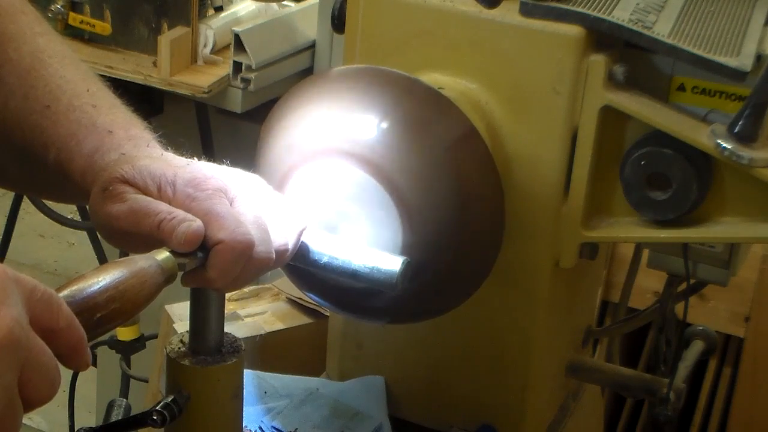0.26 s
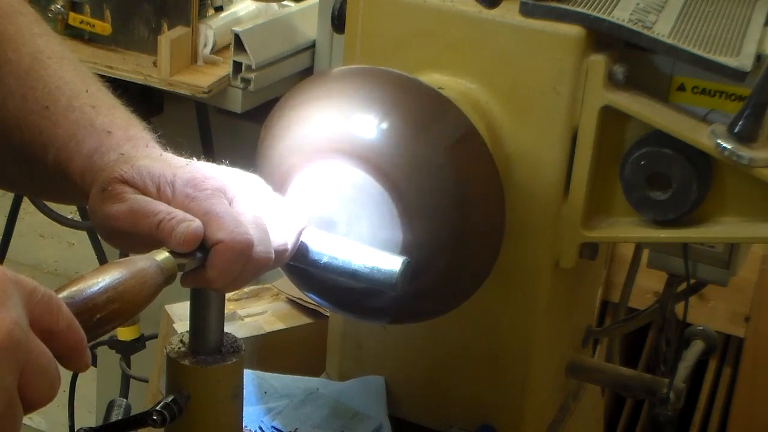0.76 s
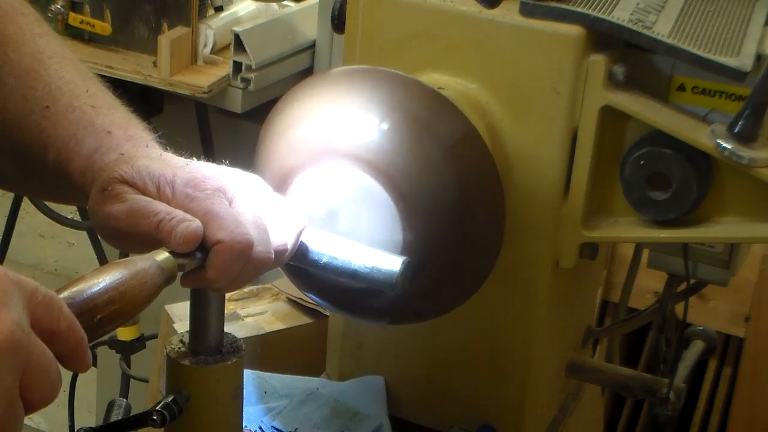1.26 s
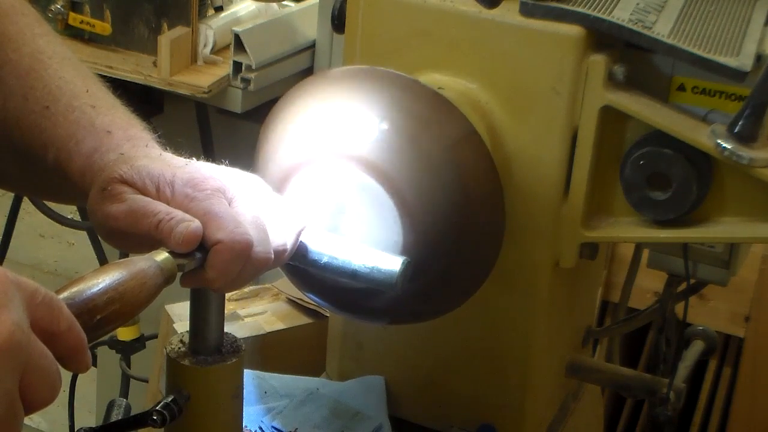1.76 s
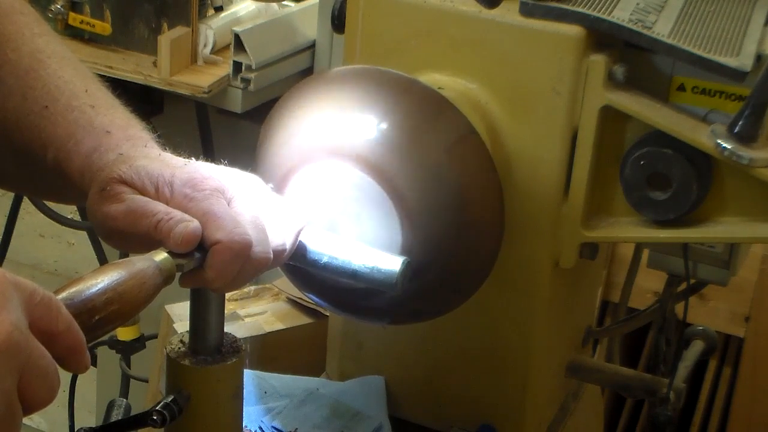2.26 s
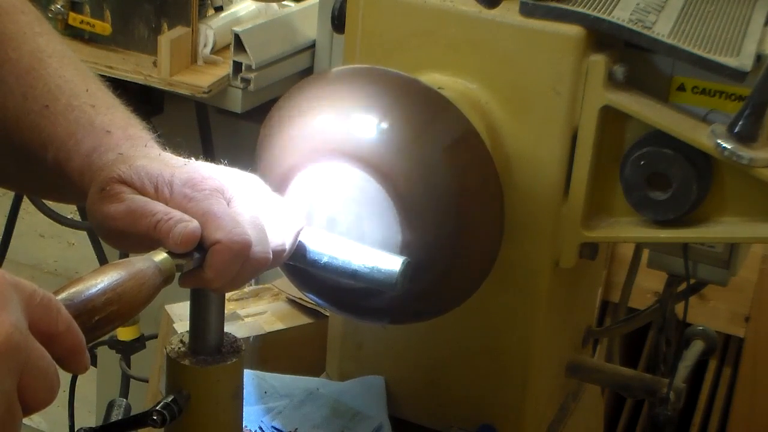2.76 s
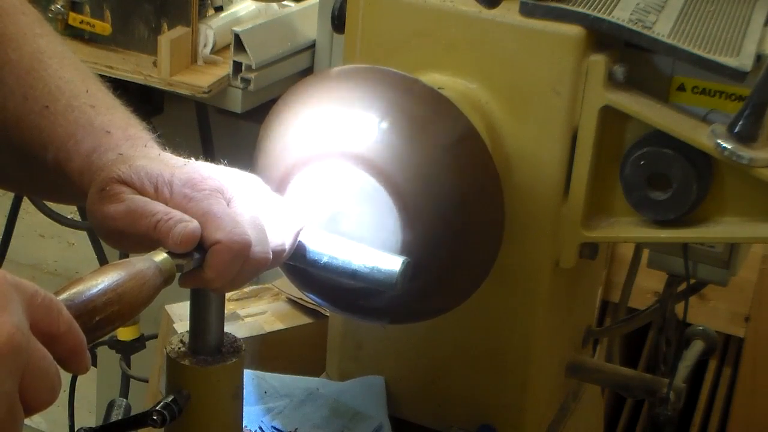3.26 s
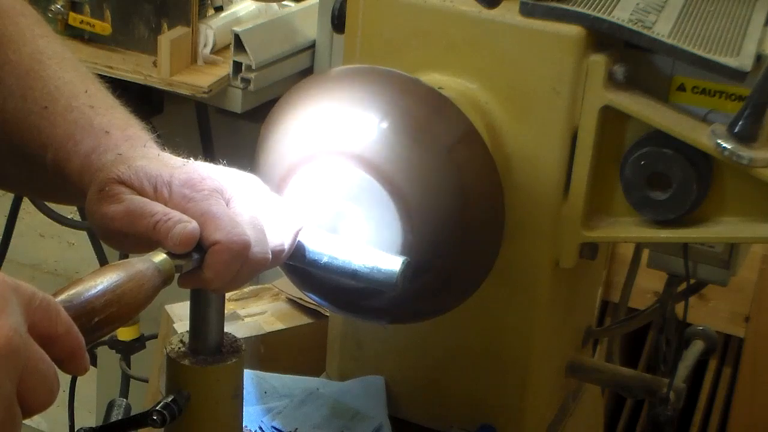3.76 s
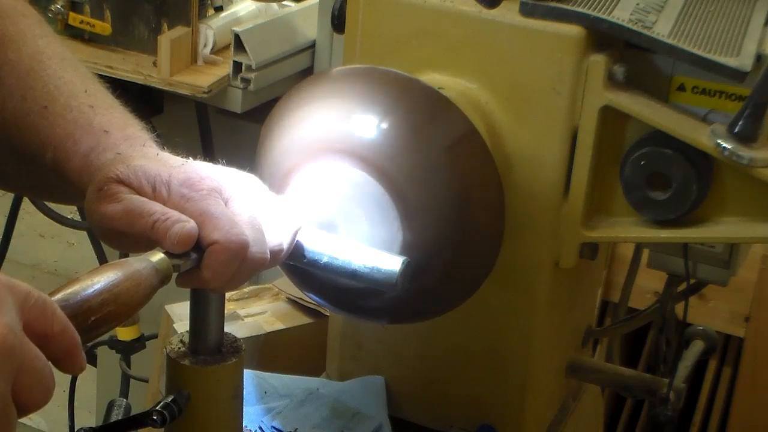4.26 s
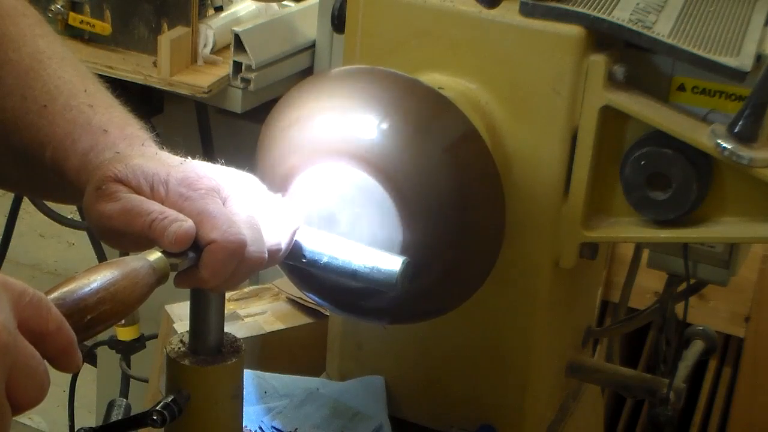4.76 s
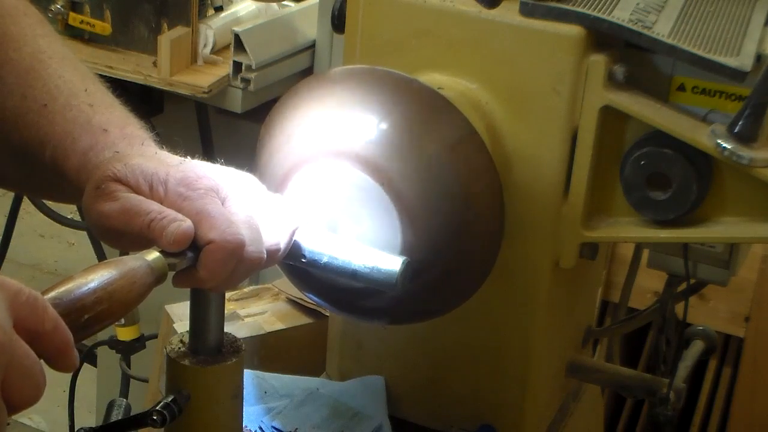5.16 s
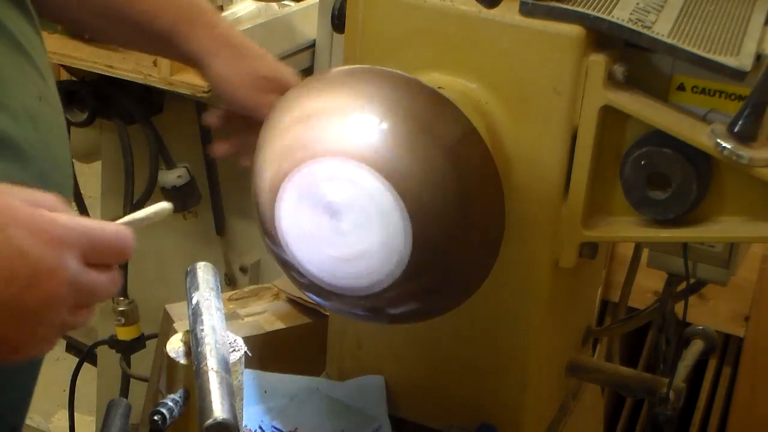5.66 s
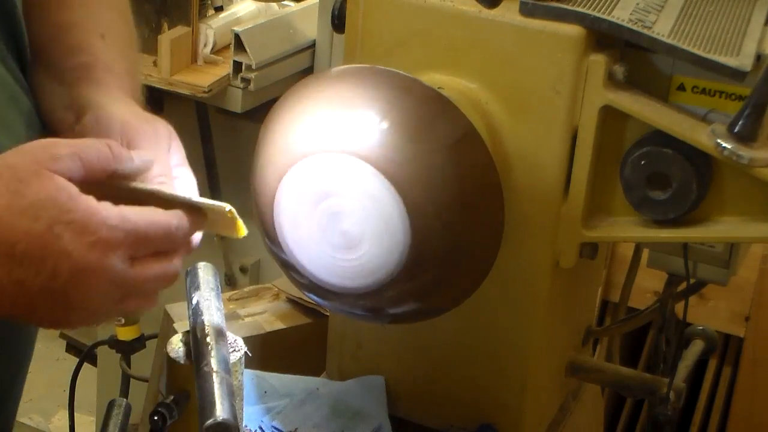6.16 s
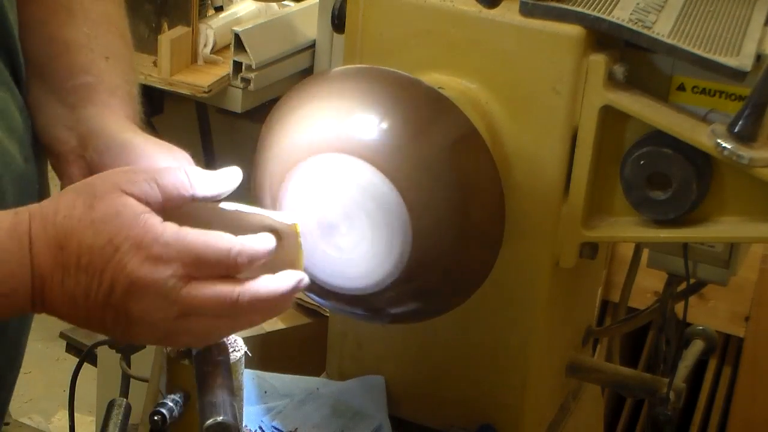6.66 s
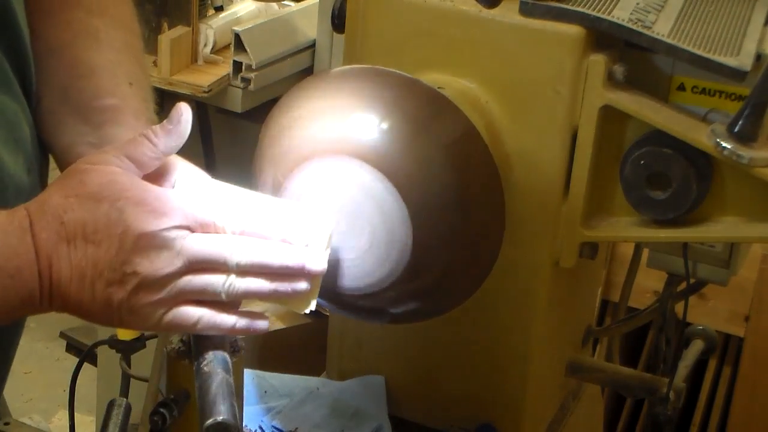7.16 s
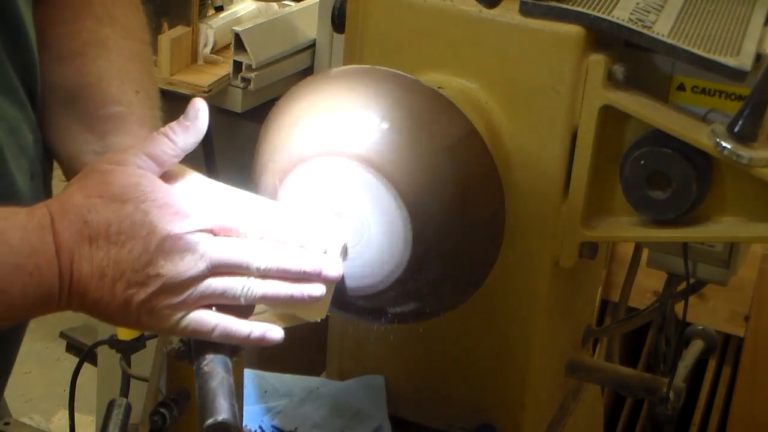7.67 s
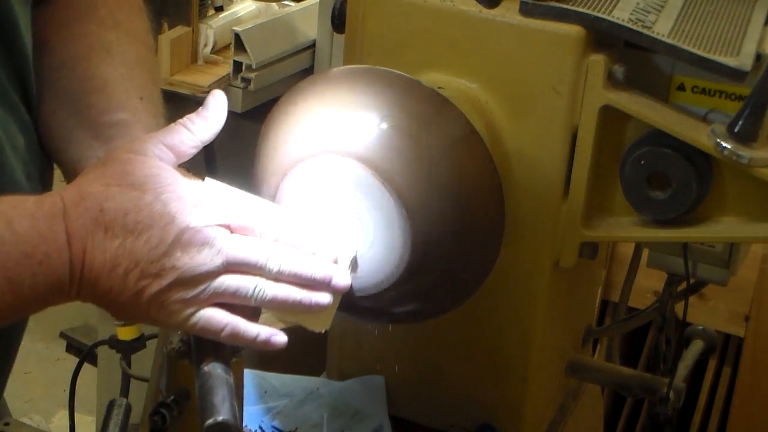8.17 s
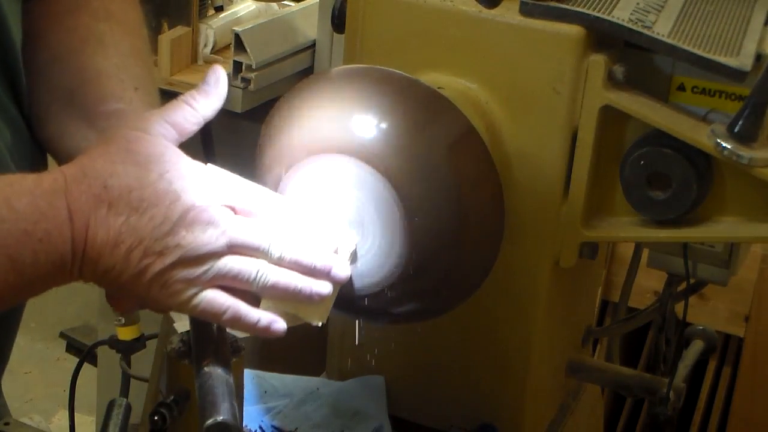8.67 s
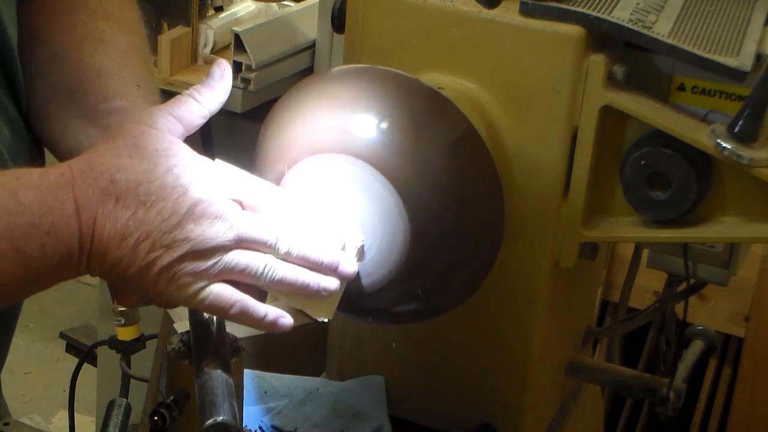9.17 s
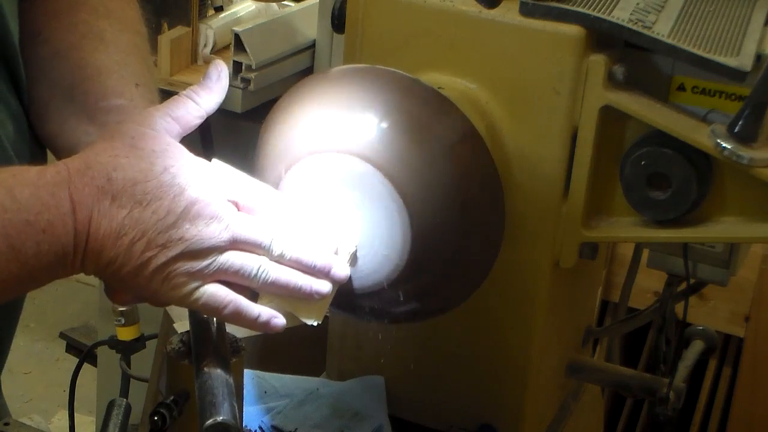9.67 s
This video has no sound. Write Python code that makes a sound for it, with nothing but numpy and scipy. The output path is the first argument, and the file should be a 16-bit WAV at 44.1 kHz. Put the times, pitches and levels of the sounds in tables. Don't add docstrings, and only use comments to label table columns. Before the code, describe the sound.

Close camera sound of woodturning over a constant low fan drone and lathe motor. For over five seconds the scraper bites twice per turn, one bite stronger, giving a rapid pulsing squeal and tearing hiss. A sudden change leaves the lathe stopped; metal clacks with a short room tail, the motor runs up, paper rustles lightly, and gritty sanding settles into a smooth, faintly throbbing hiss. The machine level ducks under loud arrivals.

```python
import sys
import numpy as np
from scipy import signal
from scipy.fft import rfft, irfft
from scipy.io import wavfile
from scipy.ndimage import uniform_filter1d, map_coordinates

SR = 44100
rng = np.random.default_rng(int(sys.argv[2]) if len(sys.argv) > 2 else 0)


def magnitude_from_level(level_db):
    exponent = np.asarray(level_db, float) / 20
    return 10 ** exponent


def to_wav(s):
    ch = np.atleast_2d(s).T
    pcm = np.round(np.clip(ch, -1, 1) * 32767)
    wavfile.write(sys.argv[1], SR, pcm.astype(np.int16))


N = 437472
T = np.arange(N) / SR
F = np.maximum(np.fft.rfftfreq(N, 1 / SR), 1)
TURN_HZ, MOTOR_TURNS = 11.718, 2.5
CUT_END_S = 5.387


def unit(x):
    return x / np.sqrt(np.mean(x ** 2))


def noise():
    return rng.standard_normal(N)


def curves(table):
    s, *columns = np.transpose(table)
    return [np.interp(T, s, c) for c in columns]


def shape(table):
    hz, db = np.transpose(table)
    return magnitude_from_level(np.interp(np.log(F), np.log(hz), db))


def colour(x, table):
    return unit(irfft(rfft(x) * shape(table), N))


def resonance(x, hz, width):
    return signal.lfilter(*signal.iirpeak(hz, hz / width, SR), x)


def ring(x, modes):
    return sum(magnitude_from_level(db) * unit(resonance(x, hz, width)) for hz, width, db in modes)


def walk(rate):
    k = int(SR / rate)
    steps = np.repeat(rng.standard_normal(N // k + 1), k)
    return unit(uniform_filter1d(uniform_filter1d(steps, k), k)[:N])


def tones(turns, orders, flutter_db):
    out = 0
    for multiple, db in orders:
        level = magnitude_from_level(db + flutter_db * walk(9)) * np.sqrt(2)
        phase = 2 * np.pi * (multiple * turns + rng.random()) + 0.32 * flutter_db * walk(4)
        out = out + level * np.sin(phase)
    return out


# (multiple of the shaft, level/dB)
FAN_ORDERS = [(9, 0), (1, -10), (2, -12), (4, -13), (5.06, -11), (6, -17), (7.1, -13), (10.1, -14),
              (11, -14), (12.15, -10), (13.1, -7)]
# (f/Hz, level/dB per Hz)
FAN_AIR = [(12, -30), (20, 2.5), (150, -19.5), (176, -10), (267, -7), (323, -16), (577, -5.5), (781, -9.5),
           (1120, -9), (1510, -14.5), (4560, -18.5), (5840, -26.5), (14500, -29)]
# (f/Hz, width/Hz, level/dB)
FAN_DUCT = [(1098, 42, -7), (1290, 60, -8.5), (4600, 310, -12), (5440, 150, -14.5)]


def fan():
    turns = 29.585 * T
    air = magnitude_from_level(3) * colour(noise(), FAN_AIR) + ring(noise(), FAN_DUCT)
    blade = tones(turns, FAN_ORDERS[:1], 0.38)
    return blade + tones(turns, FAN_ORDERS[1:], 2.45) + air


def lathe_speed():
    switch_on_s, run_up_s, bend, full_speed = 5.69, 0.82, 0.7, 0.99
    up = full_speed * np.clip((T - switch_on_s) / run_up_s, 0, 1) ** bend
    return np.where(T < CUT_END_S, 1, up)


# (f/Hz, level/dB per Hz)
MOTOR_AIR = [(240, -46), (400, -6.5), (472, -11), (516, -5.5), (600, -20), (798, -4), (1640, -6),
             (2320, -14), (4490, -26.5), (7160, -39), (10100, -21), (14500, -48)]
# (f/Hz, width/Hz, level/dB)
MOTOR_CASE = [(900, 24, -26), (1064, 10, -2.5), (1361, 17, -1), (1530, 54, -9.5), (1599, 14, -1.5),
              (1646, 45, -5.5), (4340, 260, -7.5), (3106, 64, -6.5)]
# (multiple of the motor shaft, level/dB)
MOTOR_ORDERS = [(18.2, -2), (24.05, -10), (28.1, -7)]
# (f/Hz off the carrier at full speed, level/dB)
WHINE = [(-617, -21), (-267, -17), (-29.5, -14), (29.5, -15), (88, -12), (266, -14), (352, -18), (444, -14),
         (499, -11), (616, -20), (734, -17)]


def motor():
    speed = lathe_speed()
    run = np.cumsum(speed) / SR
    db = np.where(T < CUT_END_S, -2.5, 1 - 16.5 * (1 - speed))
    air = magnitude_from_level(7 + 1.1 * walk(15)) * colour(noise(), MOTOR_AIR) + ring(noise(), MOTOR_CASE)
    belt_load = magnitude_from_level(1.5 * np.cos(2 * np.pi * TURN_HZ * run))
    shaft = tones(TURN_HZ * MOTOR_TURNS * run, MOTOR_ORDERS, 1.95) * belt_load
    carrier_hz, whine = 10000, 0
    for off, tone_db in WHINE:
        level = magnitude_from_level(tone_db + 1.6 * walk(6)) * speed ** (abs(off) / 500)
        whine = whine + level * np.sin(2 * np.pi * (carrier_hz * T + off * run + rng.random()))
    return (speed > 0) * (magnitude_from_level(db) * (air + speed ** 12 * shaft) + magnitude_from_level(3.5 + 0.09 * db) * whine)


# (t/s, peak level/dB)
RUSTLE = [(6.1469, -49), (6.2267, -34), (6.441, -34), (6.49, -36), (6.589, -39), (6.6194, -36),
          (6.7281, -42), (6.7593, -42), (6.8229, -36), (6.8578, -35), (7.0098, -41), (7.0992, -47),
          (7.2595, -39), (7.4293, -37)]
# (f/Hz, level/dB per Hz)
GRIT = [(880, -39), (1500, -3.5), (1620, -11.5), (1920, -5.5), (2610, -0.5), (3120, -6), (4060, 2),
        (5340, 3.5), (6030, 0.5), (7150, 2), (8000, -3.5), (9660, -0.5), (13500, -6), (14200, -10)]
# (t/s, level/dB)
RUB = [
    (7.46, -51),
    (7.57, -41.5),
    (7.64, -30),
    (7.77, -34),
    (7.79, -36),
    (7.9, -35),
    (8.0, -32),
    (8.6, -31.5),
    (9.92, -33),
]
# (t/s, level/dB)
JABS = [(7.605, 3.1), (7.75, 2.3), (7.939, 2.2), (8.03, 2.2), (8.1, 2), (8.265, 2.7), (8.45, 1.7),
        (9.46, 2), (9.87, 2)]
# (level/dB over the rubbing, level/dB gained with dust, share of a jab)
SAND_RANGES = [
    (-4.5, -2, 1.45),
    (0.5, -0.65, 0.7),
    (-1.5, 3, 0.42),
]
SAND_EDGES_HZ = [0, 3600, 7600, 22050]


def paper():
    folds = sum(magnitude_from_level(db - 4) * (T > s) * np.exp(-np.maximum(T - s, 0) / 0.015) for s, db in RUSTLE)
    out = folds * colour(noise(), [(1000, -11), (3000, 6), (5000, 4), (9000, -9), (14000, -7)])
    throb_db = 0.94 * np.cos(2 * np.pi * (2 * TURN_HZ * T - .05))
    grit = rfft(noise() * magnitude_from_level(0.63 * walk(300) + throb_db)) * shape(GRIT[:-1])
    rub_db = curves(RUB)[0]
    dust = np.tanh(np.maximum(T - RUB[4][0], 0) / 0.7) ** 2
    jab_db = sum(db * np.exp(-.5 * ((T - s) / 0.011) ** 2) for s, db in JABS)
    for (db, dust_db, share), lo, hi in zip(SAND_RANGES, SAND_EDGES_HZ, SAND_EDGES_HZ[1:]):
        flicker_db = walk(25) + 0.35 * walk(70)
        level = magnitude_from_level(rub_db + db + dust_db * dust + share * jab_db + flicker_db)
        out = out + (T > RUB[0][0]) * level * unit(irfft(grit * (F > lo) * (F <= hi), N))
    return out


# (t/s, peak level/dB, share that fills the shop)
CLACK = [
    (5.5377, -13.5, 0.89),
    (5.5386, -11.5, 0),
    (5.5397, -18, 0.32),
    (5.757, -42, 0.78),
]
# (f/Hz, level/dB, t60/s)
CLACK_MODES = [(326, -14.5, .15), (395, -8, 0.26), (1300, 0, 0.005), (2406, -9, 0.0038), (2880, -20, .06),
               (3332, 9, 0.0038), (3440, -22, 0.31), (3620, -22, 0.28), (4700, -23, .22), (4430, 2, 0.0079),
               (7000, -17, .002)]
# (f/Hz, level/dB per Hz)
CLACK_TAIL = [(150, -23), (330, -3), (480, -5), (600, -8.5), (1600, -11), (2600, -8), (3600, -8),
              (4900, -9), (5600, -17), (14500, -26)]


def clack():
    out, shop = 0, colour(noise(), CLACK_TAIL)
    for s, peak_db, share in CLACK:
        t = np.maximum(T - s, 0)
        modes = 0
        for k, (hz, db, t60) in enumerate(CLACK_MODES):
            modes = modes + (-1) ** k * magnitude_from_level(db - 60 * t / t60) * np.sin(2 * np.pi * hz * t)
        tail = magnitude_from_level(-60 * t / 0.11) + magnitude_from_level(-11.5 - 60 * t / 0.71)
        build = np.minimum(t / 0.0019, 1)
        out = out + magnitude_from_level(peak_db - 9) * (modes + share * build * magnitude_from_level(-3.5) * tail * shop)
    return out


def ridges():
    size, memory, wobble_s = int(SR / TURN_HZ) + 1, 0.96, 4e-5
    rows = signal.lfilter([1], [1, -memory], rng.standard_normal((90, size)), axis=0)[20:]
    wobbly = T + wobble_s * np.sin(2 * np.pi * TURN_HZ * MOTOR_TURNS * T)
    turns = TURN_HZ * np.minimum(wobbly, 5.5) + 1
    return unit(map_coordinates(rows, [turns // 1, turns % 1 * (size - 1)], order=3))


def turns_from(at, late):
    return (TURN_HZ * T - late - at + .5) % 1 - .5


def bite(bites, weak_db, late):
    swell = []
    for at, rise, fall, db in bites:
        off = turns_from(at, late)
        swell.append(db * np.exp(-.5 * (off / np.where(off < 0, rise, fall)) ** 2))
    return magnitude_from_level(swell[0] + swell[1] * (1 + weak_db / bites[1][3]))


# (place/turns, length/turns, f/Hz, glide/Hz per turn, level/dB, share of weaker bite's dB)
CHATTER = [(.48, .06, 2200, 250, -3, 0), (.5, .065, 2335, 150, -2.5, 0), (.92, .055, 2230, 300, -8, 2.2),
           (.94, .06, 2335, 0, -7.5, 2.2), (.5, .05, 2580, 0, -13, 0), (.93, .04, 3090, 0, -13, 0),
           (.51, .045, 5280, 1500, -11, 0)]
# (place/turns, f/Hz, centre t/s, span/s, level/dB)
PASSING = [(.5, 3900, 3.4, .6, -7), (.5, 3600, 4.9, .5, -6), (.5, 5560, 2.6, 1.4, -10),
           (.49, 3050, 3.5, .5, -7), (.49, 3060, .8, 1, -7), (.5, 5200, 3.6, 1.5, -5),
           (.4, 850, 3.8, 1.8, -7), (.42, 3520, .3, .5, -8), (.5, 4000, 1, .5, -9), (.5, 4190, 2.8, .7, -8),
           (.55, 4350, 4, .8, -7), (.5, 5000, 2.1, .4, -8), (.47, 2090, 3.6, .5, -8)]


def chatter(weak_db, late):
    bursts = [(*row[:4], magnitude_from_level(row[4] + row[5] * weak_db)) for row in CHATTER]
    for at, hz, s, span, db in PASSING:
        bursts.append((at, 0.036, hz, 0, magnitude_from_level(db) * np.exp(-.5 * ((T - s) / span) ** 2)))
    out = 0
    for at, length, hz, glide, size in bursts:
        off = turns_from(at, late)
        phase = 2 * np.pi * (hz + glide * off / 2) * off / TURN_HZ
        phase = phase + 0.76 * walk(3.02) + 0.2 * walk(120)
        level = size * magnitude_from_level(0.56 * walk(6.5) + 0.74 * walk(150))
        out = out + level * np.exp(-.5 * (off / length) ** 2) * np.sin(phase)
    return out


# (t/s, pressure level/dB, weaker bite level/dB)
PRESSURE = [(0, 1, 2), (.6, .5, 1), (1.3, 0.5, -1), (2.6, 0, -0.5), (3.6, -0.5, -1), (4.6, -0.1, 0),
            (5.39, 0.5, -2.5)]
# (place/turns, rise/turns, fall/turns, swell level/dB)
BOWL_BITES = [
    (.42, 0.01, 0.015, 11.4),
    (.84, 0.014, 0.027, 2.1),
]
TOOL_BITES = [
    (.48, 0.11, 0.14, 9.6),
    (.92, 0.074, 0.15, 7.7),
]
HISS_BITES = [
    (.47, 0.058, 0.11, 11.2),
    (.97, 0.015, 0.21, 3.6),
]
# (f/Hz, width/Hz, level/dB)
BOWL = [(820, 47, 0.5), (832, 71, -1), (897, 82, 2), (895, 99, -29), (1393, 52, 0)]
REST = [(198, 9.6, 6), (218, 14, -3)]
TOOL_LOW = [(2090, 45, -11), (2191, 35, -2), (2250, 40, -9), (2332, 35, 0), (2414, 35, -7), (2578, 45, -10),
            (3047, 50, -8), (3125, 60, -10)]
TOOL_HIGH = [(3450, 26, -5), (3550, 17, 0), (4240, 26, 0), (4345, 58, -1), (4570, 70, -6), (5090, 200, 1),
             (5650, 150, -17)]
SHAVING_RING = [(6360, 120, -14.5), (6670, 69, -11.5), (7260, 90, -15.5), (8530, 410, -10.5),
                (9070, 170, -12), (9850, 140, -18)]
# (f/Hz, level/dB per Hz)
SHAVING = [(600, -10), (1500, -10.5), (4000, 3.5), (6500, -3), (7800, -7.5), (9000, -8), (11000, -10.5),
           (13000, -7.5), (14500, -22)]
# (f/Hz, width/Hz, share removed 0-1)
TOOL_DIPS = [(2740, 92, 0.05), (3760, 150, 0.46), (4670, 140, 0.27), (2455, 32, 0.3), (3380, 76, 0.1)]
# (level/dB at the start, slope/dB per s)
LAYERS = [
    (-43, 0.07),
    (-34, -.5),
    (-36, -0.91),
    (-43.5, .7),
    (-35.5, 0.23),
]


def scraper():
    push_db, weak_db = curves(PRESSURE)
    late = .03 - 0.007565 * T
    wood, fresh = ridges(), noise()
    shove = wood * bite(BOWL_BITES, 0, late)
    no_bass = signal.butter(4, 760, "high", fs=SR, output="sos")
    bowl = signal.sosfilt(no_bass, ring(shove, BOWL))
    edge = (wood + magnitude_from_level(-9.5) * fresh) * bite(TOOL_BITES, weak_db, late)
    tear = (fresh + 0.81 * wood) * bite(HISS_BITES, weak_db, 0) * magnitude_from_level(1.04 * walk(150))
    hiss = colour(tear, SHAVING) + ring(tear, SHAVING_RING)
    layers = [bowl, chatter(weak_db, late), ring(edge, TOOL_LOW), ring(edge, TOOL_HIGH), hiss]
    out = sum(magnitude_from_level(db + slope_db * T) * unit(x) for (db, slope_db), x in zip(LAYERS, layers))
    for hz, width, share in TOOL_DIPS:
        out = out - share * resonance(out, hz, width)
    rest_db = -55.5 - 12 * np.tanh(((T - 3.15) / 1.7) ** 2)
    rest = magnitude_from_level(rest_db) * unit(ring(shove, REST))
    return (T < CUT_END_S) * magnitude_from_level(push_db) * (out + rest)


# (t/s, depth level/dB, attack/s, hold/s, release/s)
DUCKS = [
    (5.528, -14.5, 0.077, 0.36, 0.21),
    (7.577, -4.5, 0.25, 0.061, 0.19),
]


def gain_db():
    rest_db, under_cut_db, under_sand_db = -45, -5.5, -2.5
    sanding = np.clip((T - RUB[1][0]) / 0.14, 0, 1)
    db = rest_db + under_cut_db * (T < CUT_END_S) + under_sand_db * sanding
    for s, depth_db, attack, hold, release in DUCKS:
        corners = np.cumsum([0, attack, hold, release])
        db = db + depth_db * np.interp(T - s, corners, [0, 1, 1, 0])
    return db


# (f/Hz, side level/dB)
SIDE_DB = [(25, 4), (70, -9), (125, -5.5), (250, -20.5), (680, -16.5), (1250, -18), (2300, -16.5),
           (4210, -8.5), (7740, -1), (14200, -4.5)]
# (f/Hz, level/dB)
LEAN_DB = [(60, -1.3), (110, 0.32), (200, -1.2), (370, 0.16), (680, 0.44), (1250, -0.39), (2300, 0.83),
           (4210, 0.2), (7740, -0.2), (14200, -2.0)]


def scene():
    gain = magnitude_from_level(gain_db())
    work = scraper() + clack() + paper()
    mid = rfft(gain * (fan() + motor()) + work)
    scatter = rfft(noise() * np.exp(-T / 0.022))
    scattered_work = rfft(work) * scatter / np.abs(scatter)
    side = shape(SIDE_DB) * (rfft(gain * (fan() + motor())) + scattered_work)
    lean = np.sqrt(shape(LEAN_DB))
    return np.array([irfft((mid + side) * lean, N), irfft((mid - side) / lean, N)])


def top_cut(x):
    return signal.sosfilt(signal.butter(12, 14800, fs=SR, output="sos"), x)


def record(dry):
    mix = irfft(rfft(dry) * (F < 14300), N)
    return top_cut(mix)


dry = scene()
out = record(dry)
to_wav(out)
```